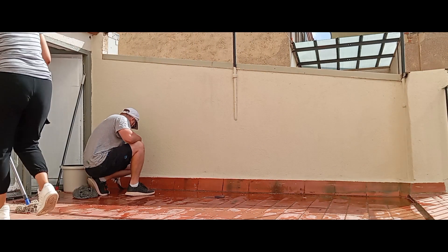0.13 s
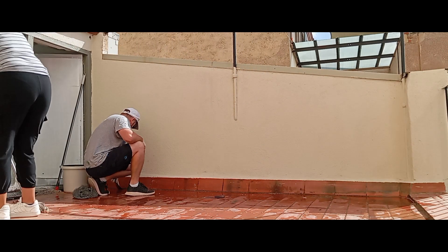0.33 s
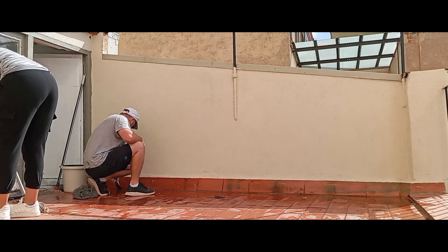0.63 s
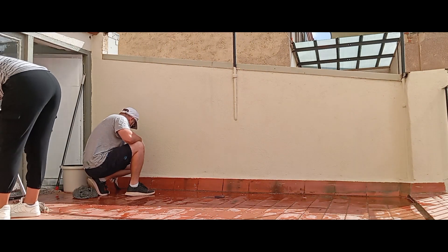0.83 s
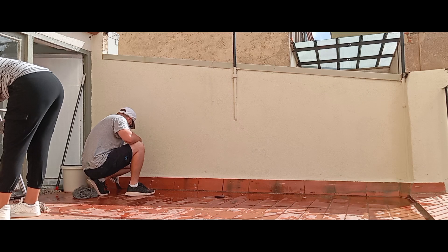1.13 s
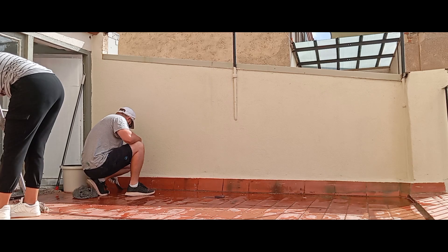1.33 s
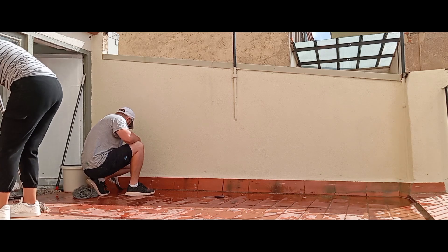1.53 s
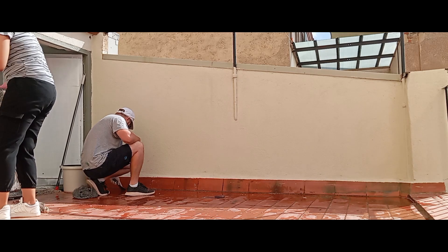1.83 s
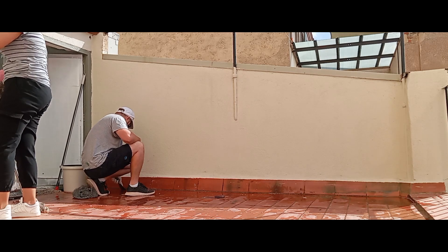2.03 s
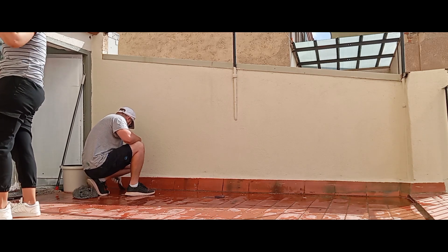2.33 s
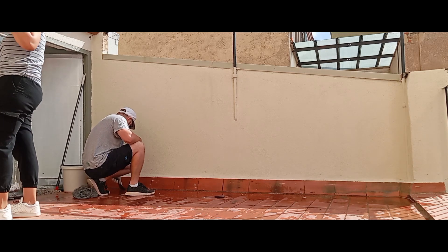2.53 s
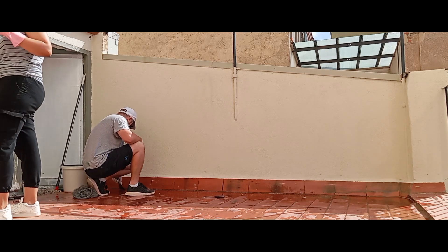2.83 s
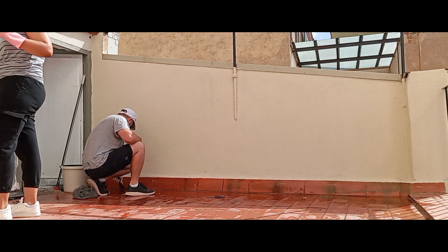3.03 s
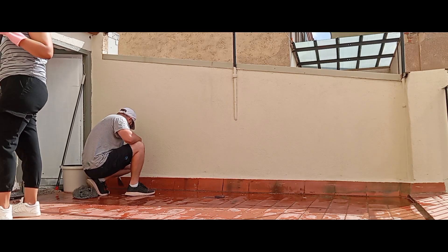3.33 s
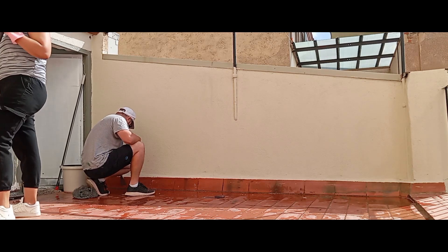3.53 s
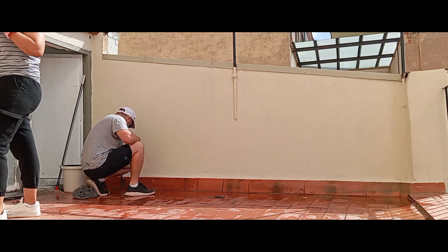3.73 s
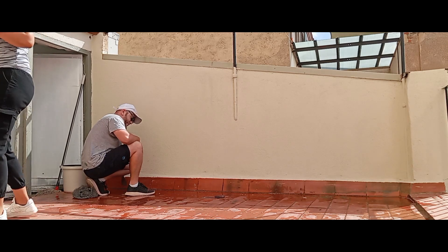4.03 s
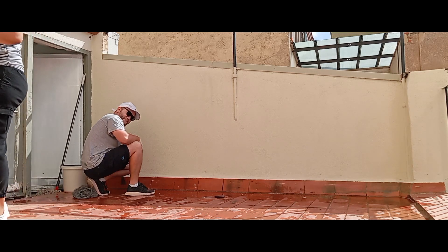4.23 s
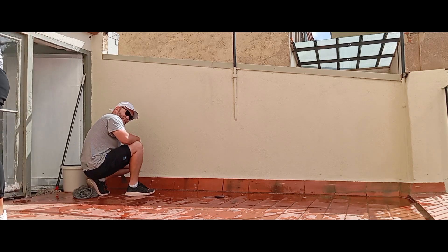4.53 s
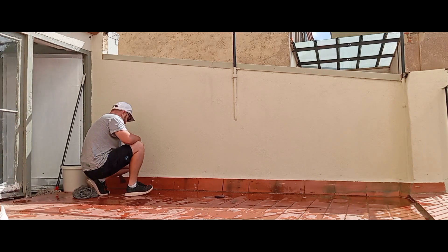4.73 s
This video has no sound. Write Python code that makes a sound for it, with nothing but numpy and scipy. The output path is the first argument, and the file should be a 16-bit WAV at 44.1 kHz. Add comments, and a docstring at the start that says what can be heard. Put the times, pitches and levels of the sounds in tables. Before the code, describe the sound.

Short scratchy strokes of a metal blade on floor tiles, bright and gritty with brief singing tones and crisp ticks. A hollow plastic bucket clunks and chatters early on. The strokes fade to near quiet past the middle, a hard clack of the blade breaks in, and scraping builds again to the end. Open-air terrace with short wall reflections, low wind bumps on the microphone and faint distant town noise.

```python
"""A steel hand scraper works over gritty floor tiles in the corner of a walled roof terrace.
From the start uneven grit drives the blade's modes and sets it singing, stroke after stroke, over
light wind buffeting the microphone and a faint town wash, both shaped noise. Soon spatters snap off:
short bursts that ring the same blade. After a second a hollow plastic bucket is set down and rocks to
rest: decaying modes and a noise rattle. Later the scraper slaps down with a dense, rattling crack.
The walls return sparse echoes."""
import sys
import numpy as np
from scipy import signal
from scipy.fft import rfft, irfft
from scipy.io import wavfile
from scipy.ndimage import uniform_filter1d

SR = 44100
rng = np.random.default_rng(int(sys.argv[2]) if len(sys.argv) > 2 else 0)


def inscribe(sig):
    """Save sig as 16-bit PCM at rate SR to the path in sys.argv[1].

    A 1-D sig is mono; a 2-D sig holds one channel per row.
    Samples are clipped to [-1, 1] before scaling.
    """
    pcm = np.round(np.clip(np.atleast_2d(sig).T, -1, 1) * 32767)
    wavfile.write(sys.argv[1], SR, pcm.astype(np.int16))


N = 215008

# Strokes of the scraper. Each row: start in seconds, rise to the peak in seconds, level in dB,
# treble lift in dB, tone at which the bent blade sings in Hz, its level over the grit in dB, its glide in %.
SCRAPER_STROKES = [(0.0, 0.0054, -41, -3, 1935, -8.5, -1.5), (0.065, 0.041, -34, 1.5, 1299, -0.5, 18.5),
                   (0.135, 0.17, -46, -29, 804, -2.5, -8), (0.207, .018, -31, -8.5, 1820, -37, 37),
                   (0.303, 0.048, -32.5, 2.5, 2120, -9.5, -3), (0.42, 0.04, -35.5, -16, 2070, -20, -6.5),
                   (0.52, 0.05, -31.5, 0.5, 2222, -11, -1.5), (0.65, 0.044, -43, -39, 1098, 2, -13),
                   (0.753, .05, -32.5, 1.5, 2197, -3, -0.2), (1.138, 0.019, -43, 15, 2600, -41, -11),
                   (1.258, 0.049, -29.5, 8.5, 2300, -14, 4.6), (1.412, 0.021, -36.5, 0, 1683, -4, 36),
                   (1.506, 0.058, -30.5, -3.5, 1648, -10.5, 1), (1.763, 0.05, -39.5, 12, 2680, -6, 1),
                   (1.856, 0.081, -34, -11, 2050, -2.5, 16.5), (1.999, 0.046, -30, 5, 620, -14.5, -6),
                   (2.139, 0.037, -35.5, -3, 1960, -17, 4), (2.257, 0.027, -37, 3.5, 1174, -3, -4),
                   (2.366, 0.012, -44, -6, 2050, 8, 11), (2.502, 0.015, -53, -17, 1184, 14.5, 5),
                   (2.59, 0.044, -49, -15, 1810, -8, -9.5), (2.761, 0.0056, -56.5, -6, 1162, 3.5, -6.5),
                   (3.002, 0.013, -41.5, 14.5, 1820, -6.5, 2), (3.072, 0.017, -55.5, 7.5, 700, 8, 0.3),
                   (3.141, 0.065, -47.5, 7, 1214, -9.5, 0), (3.331, 0.018, -24.5, -8, 1840, -15.5, -4.5),
                   (3.44, 0.043, -42.5, -1.5, 896, -9.5, -3), (3.551, .03, -45, -33, 2100, 3, 7.5),
                   (3.678, 0.03, -49.5, 12.5, 2990, 1.5, -3.5), (3.768, 0.032, -39, 0.5, 1216, -6.5, 11),
                   (3.882, 0.044, -40, 7, 1205, -8, 2), (3.975, 0.042, -42.5, 1, 1640, -1.5, -6.5),
                   (4.068, 0.055, -37, 8.5, 1590, -1.5, -0.5), (4.171, 0.048, -37.5, 3, 1594, -10, -7.5),
                   (4.283, 0.05, -28.5, 1.5, 1205, -8, 3), (4.379, 0.047, -36, -5, 2690, -12, 11),
                   (4.478, 0.052, -33, -1.5, 2090, -16, -1), (4.606, 0.029, -34.5, 6.5, 2260, -15, -8.5),
                   (4.691, 0.019, -32, 7.5, 5385, -6, 2), (4.829, 0.0047, -59.5, 23, 2000, 17.5, -4.5),
                   (4.859, 0.015, -42.5, 27, 1220, 1.5, 4.5)]
# Modes of the steel blade. Each row: frequency in Hz, nominal width in Hz, relative level in dB.
BLADE_MODES = [(804, 60, -4), (993, 89, -5), (1215, 62, 0), (1590, 14.3, 5), (2025, 470, 13.5),
               (2698, 68, 5.5), (3346, 24, 1), (3772, 32, -0.5), (4332, 150, 0.5), (4736, 110, -0.5),
               (5314, 30, -1), (5945, 240, 5.5), (6560, 310, 1), (8910, 60, -8), (9590, 36, -10),
               (10260, 15, -13), (11000, 73, -14), (9800, 120, -38), (11980, 93, -28), (12050, 220, -14),
               (14700, 170, -19)]


def gain_of(db):
    """Decibels to amplitude."""
    return 10 ** (np.asarray(db) / 20)


def evened(x):
    """Scales to rms 1."""
    return x / np.sqrt(np.mean(x ** 2) + 1e-20)


def read(points, hz):
    """Reads a table of (Hz, value) on a log-frequency axis."""
    f, value = np.transpose(points)
    return np.interp(np.log(hz + 1), np.log(f + 1), value)


def add(mix, s, sound):
    """Mixes a sound in at second s, cutting what falls outside."""
    at = round(s * SR)
    sound = sound[max(-at, 0):]
    part = mix[max(at, 0):][:len(sound)]
    part += sound[:len(part)]


def coloured(points):
    """Steady noise of rms 1 with the given spectrum."""
    spectrum = rfft(rng.standard_normal(N))
    return evened(irfft(spectrum * gain_of(read(points, np.fft.rfftfreq(N, 1 / SR))), N))


def resonate(x, hz, width):
    """A moving resonance: shifts the curve hz to zero, smooths and shifts back; white noise keeps its rms."""
    turn = np.exp(2j * np.pi * np.cumsum(hz) / SR)
    r = np.exp(-np.pi * width / SR)
    smooth = signal.lfilter([np.sqrt(2 * (1 - r ** 2))], [1, -r], x / turn)
    return (turn * smooth).real


def drift(count, size, step=512):
    """Slow random curves, a new value about every 12 ms."""
    knots = rng.standard_normal((count, size // step + 2))
    knots = uniform_filter1d(knots, 2, axis=1) * np.sqrt(2)
    return [np.interp(np.arange(size) / step, np.arange(len(k)), k) for k in knots]


def blade(drive, low_db, hiss_db, treble_db):
    """Grit colour times the blade's modes, which shift with the grip and bend as the edge moves."""
    # Spectrum of the grit. Each row: frequency in Hz, relative level in dB.
    grit_curve = [(450, -65), (700, -17), (1100, -9), (2000, -2), (3200, -1), (6200, -3.5), (7600, -10),
                  (9000, -30.5), (13500, -40.5), (15500, -19.5)]
    grip_db, bend = 3.0, 0.0127  # spread of the mode levels; spread of their pitch as a share
    size, count = len(drive), len(BLADE_MODES)
    rings = gain_of(-8) * drive  # grit heard without the modes
    grips = rng.standard_normal((count, 2))
    for (f, width, db), (louder, higher), flex in zip(BLADE_MODES, grips, drift(count, size)):
        lift_db = db - 14 - read(grit_curve, f) + grip_db * louder
        pitch = f * (1 + bend * (0.37 * higher + flex))
        rings = rings + resonate(drive * gain_of(lift_db), pitch, max(width, f / 130))

    # small modes and gaps come and go
    _, _, z = signal.stft(rings, nperseg=1024, noverlap=896)
    patches = uniform_filter1d(rng.standard_normal(z.shape), size=4, axis=0)
    patches = uniform_filter1d(patches, size=18, axis=1)
    small_db = 7 * np.clip(evened(patches), -3, 1.5)
    rings = signal.istft(z * gain_of(small_db), nperseg=1024, noverlap=896)[1][:size]

    hz = np.fft.rfftfreq(size, 1 / SR)
    low = 1 / (1 + (hz / 1500) ** 6)
    above_hiss = 1 / (1 + (3000 / (hz + 1)) ** 8)
    above_treble = 1 / (1 + (7800 / (hz + 1)) ** 8)
    tilt_db = low_db * low + hiss_db * (above_hiss - above_treble) + treble_db * above_treble
    return irfft(rfft(rings) * gain_of(read(grit_curve, hz) + tilt_db), size)


def stroke(row, size=10240, lead=0.065):
    """Dense uneven grit, swelling and dying with the speed of the hand, drives the blade and its singing."""
    # Colour of the grit across the tiles.
    # Each row: time in seconds, lift of the low part in dB, lift of the hiss in dB.
    tile_colour = [(0, 5, 5.5), (.25, 3.5, -3.5), (.45, 20.5, 3.5), (.55, -6.5, -2.1), (1.4, 21, 4),
                   (1.55, 4, -4.5), (1.75, 23, 9.5), (2.0, 11, -1), (2.3, 7.5, -2.5), (3.1, 15, 0.5),
                   (3.45, 5.5, -7), (3.58, -14, -31), (3.68, 13, -2.5), (3.75, 2, 5.5), (3.9, -13, 1.2),
                   (4.15, -4, 5.5), (4.3, -9.5, -10), (4.88, -2, 11)]
    release_s, longer_per_db = 0.021, 0.012  # easing off; harder strokes trail off longer, share per dB
    bite_db_per_s = 611  # steepens the rise as the edge first meets the tile
    second_db = -13  # a second mode of the blade joins the singing
    s, rise, db, treble_db, first_hz, sing_db, glide = row
    t, rise = np.arange(size) / SR - lead, max(rise, 0.002)

    release = release_s * np.clip(1 + longer_per_db * (db + 33.5), 0.4, 2)
    swelling, easing = abs(1 - t / rise) ** 2.23, (abs(t - rise) / release) ** 1.185
    speed = gain_of(-6 * np.where(t < rise, swelling, easing))
    speed = speed * gain_of(bite_db_per_s * np.minimum(t, 0))

    lumps = gain_of(2.0 * evened(uniform_filter1d(rng.standard_normal(size), 150)))
    grains = rng.standard_normal(size) * gain_of(1.8 * np.minimum(rng.exponential(1, size), 4))
    drive = evened(grains * lumps) * speed

    along = np.clip(t / (rise + release_s) - 0.5, -0.6, 0.6)
    pitch = first_hz * (1 + glide / 100 * along + 0.0062 * drift(1, size)[0])
    # slips fall in step with the tone
    locked = speed * gain_of(5.5 * drift(1, size)[0]) * np.sin(2 * np.pi * np.cumsum(pitch) / SR)
    first = 0.8 * resonate(drive, pitch, 50) + 0.8 * locked
    second_hz = rng.choice([f for f, _, _ in BLADE_MODES if 2500 < f < 7000])
    second = resonate(drive, np.full(size, second_hz), 30 + second_hz / 150)

    times, low_db, hiss_db = np.transpose(tile_colour)
    peak_s = s + rise
    grit = blade(drive, np.interp(peak_s, times, low_db), np.interp(peak_s, times, hiss_db), treble_db)
    grit = evened(grit) * np.std(speed * np.sign(drive))  # the hand sets the loudness, whatever the grip
    singing = gain_of(sing_db) * first + gain_of(min(sing_db, 0) + second_db) * second
    return s - lead, gain_of(db) * (grit + singing)


def wind():
    """Low lumpy buffeting at the microphone: shaped noise in a calm bed and short puffs."""
    # Spectrum of the buffeting. Each row: frequency in Hz, relative level in dB.
    gust_curve = [(20, -14), (40, 5.5), (65, 23), (100, 22), (140, 0), (200, -1.5), (300, -47)]
    # Puffs over the calm. Each row: time of the peak in seconds, level in dB.
    puffs = [(.28, -59), (.88, -52), (1.0, -71), (1.98, -57), (2.67, -53.5), (2.78, -49), (3.11, -50.5),
             (3.87, -56.5), (4.75, -70)]
    calm_db, half_width_s = -65, 0.046
    t = np.arange(N) / SR
    swell = sum(gain_of(db - 6.2 * ((t - s) / half_width_s) ** 2) for s, db in puffs)
    return coloured(gust_curve) * (gain_of(calm_db) + swell)


def town():
    """The faint town wash: steady noise with a fixed spectrum."""
    # Spectrum of the wash. Each row: frequency in Hz, relative level in dB per Hz.
    town_curve = [(76, -13), (130, 0), (187, -16), (308, -5), (392, -16.5), (575, -10), (859, -15),
                  (1230, -12), (7980, -33), (8820, -37), (9950, -40), (15800, -75)]
    return gain_of(-62.5) * coloured(town_curve)


def catch(row, size=4096, lead=0.005, length=0.0033):
    """The edge catches: a short burst of grit rings the same blade, one tone above the rest."""
    tone_db, brighter_db = 3.2, 6  # tone over the crack; treble over that of the latest stroke
    s, db, tone_hz = row
    begun = [stroke_row for stroke_row in SCRAPER_STROKES if stroke_row[0] < s + lead]
    treble_db = begun[-1][3] + brighter_db
    u = np.maximum(np.arange(size) / SR - lead, 0) / length
    crack = rng.standard_normal(size) * u * np.exp(-1.5 * u)
    tone = evened(resonate(crack, np.full(size, tone_hz), 40))
    ring = evened(blade(crack, -1.4, 1.6, treble_db)) + gain_of(tone_db) * tone
    return s - lead - length, gain_of(db) * ring / abs(ring).max()


def bump(row):
    """Decaying modes and a noise rattle, each bump reaching its own range of modes, over a hollow boom."""
    # Modes of the plastic bucket, which lend their ring to every bump.
    # Each row: frequency in Hz, relative level in dB, time to fall 60 dB in seconds.
    bucket_modes = [(108.4, 0, .65), (136.7, -6.5, 0.45), (238.4, 0.5, 0.13), (276.2, 0, 0.12),
                    (410, -6, 0.13), (494.7, 4.5, 0.062), (553, 1.5, 0.066), (642, -6, 0.11),
                    (848, 5, 0.041), (971, -0.5, 0.049), (1200, -26, 0.026), (1407, 4.5, 0.05),
                    (1750, 0, 0.023), (1960, -19, 0.1)]
    settled_s = 0.285  # all ringing has stopped this long after the start
    s, db, centre_hz, boom_db, rattle_db = row
    t = np.arange(SR // 3) / SR
    chance = rng.standard_normal((len(bucket_modes), 2))
    ring = 0
    for (f, mode_db, t60), (louder, higher) in zip(bucket_modes, chance):
        reach_db = boom_db if f < 170 else -11 * abs(np.log2(f / centre_hz)) ** 1.54
        level_db = mode_db + reach_db + 2.5 * louder
        swell = 1 - np.exp(-(t * f / 1.1) ** 2)  # each mode builds over about one cycle
        tone = np.sin(2 * np.pi * f * (1 + 0.015 * higher) * t)
        ring = ring + swell * gain_of(level_db - 60 * t / t60) * tone

    band = signal.butter(3, [0.7 * centre_hz, 2.8 * centre_hz], "bandpass", fs=SR, output="sos")
    rattle = evened(signal.sosfilt(band, rng.standard_normal(len(t)))) * (1 - np.exp(-t / 0.0045))
    rattle = gain_of(rattle_db - 60 * t / 0.11) * rattle
    return s, gain_of(db) * np.clip((settled_s - t) / 0.03, 0, 1) * (ring + rattle)


def rocking(count=7):
    """Uneven fading taps of the settling bucket, as rows for bump."""
    start_s, gap_s, first_db, fade_db_per_s = 1.095, 0.022, -23, 39.5
    middle_hz, boom_db, rattle_db = 500, -18, -7
    late, colour = rng.uniform(-1, 1, (count, 2)).T
    t = (np.arange(count) + 0.4 * late) * gap_s
    return [(start_s + s, first_db - fade_db_per_s * s, middle_hz * (1 + 0.45 * c), boom_db, rattle_db)
            for s, c in zip(t, colour)]


def terrace(x):
    """Sparse echoes of random sign between the walls, each band dying at its own speed."""
    # Echo decay. Each row: frequency in Hz, time to fall 60 dB in seconds.
    decay = [(200, 0.48), (1000, 0.15), (4000, 0.25), (12000, 0.05)]
    taps = np.zeros(SR // 2)
    at = np.arange(150, len(taps) - 20, 20)
    taps[at + rng.integers(0, 20, len(at))] = rng.choice([-1., 1.], len(at))
    hz, t, z = signal.stft(taps, SR, nperseg=256)
    fade = gain_of(-60 * t / read(decay, hz)[:, None])
    tail = signal.istft(z * fade, SR, nperseg=256)[1]
    return signal.fftconvolve(x, tail / np.linalg.norm(tail))[:N]


def scene():
    """All sources on the terrace, their echoes, wind and town."""
    # The edge catches a spatter or knocks the tile.
    # Each row: time in seconds, peak level in dB, ringing tone in Hz.
    catches = [(0.225, -18, 1930), (0.313, -28, 1210), (0.343, -20, 2120), (0.457, -23, 1980),
               (0.472, -22, 950), (0.495, -28, 840), (0.807, -23, 2140), (0.829, -25, 2190),
               (1.28, -20, 2350), (1.764, -33, 2670), (1.797, -25, 1990), (1.836, -30, 6820),
               (1.946, -22, 2130), (2.057, -23, 6100), (2.259, -29, 2070), (2.644, -36, 1390),
               (2.769, -45, 1280), (3.01, -32, 650), (3.075, -38, 960), (3.144, -40, 1780),
               (3.179, -35, 1200), (3.329, -12, 1930), (3.703, -36, 2950), (4.114, -24, 1590),
               (4.133, -23, 2020), (4.336, -21, 1980), (4.507, -24, 2080), (4.71, -21, 2200)]
    # The bucket lands with four blows; at 2.79 s a faint low puff of wind, played like a bump; at 3.325 s the
    # scraper slaps down with a dense, rattling crack; last a faint bump. Each row: start in seconds, level in
    # dB, centre of the modes that it reaches in Hz, hollow boom in dB, rattle in dB.
    bumps = [(1.069, -19, 650, -20, -7), (1.079, -20.5, 453, -4, -10), (1.127, -21, 420, -16, -10),
             (1.163, -20.5, 900, -20, -10.5), (2.79, -54, 300, -25, -9), (3.325, -26, 1050, -40, 5),
             (3.738, -36, 490, -40, -25)]
    near = np.zeros(N)
    for table, play in ((SCRAPER_STROKES, stroke), (catches, catch), (bumps, bump), (rocking(), bump)):
        for row in table:
            add(near, *play(row))
    return (near + gain_of(-14) * terrace(near) + wind() + town())[None]


def record(dry):
    """The band limit of the recorder: a steep low-pass at 15750 Hz."""
    low_pass = signal.firwin(511, 15750, window=("kaiser", 9), fs=SR)
    return signal.oaconvolve(dry, low_pass[None], "same")


dry = scene()
out = record(dry)
inscribe(out)
```